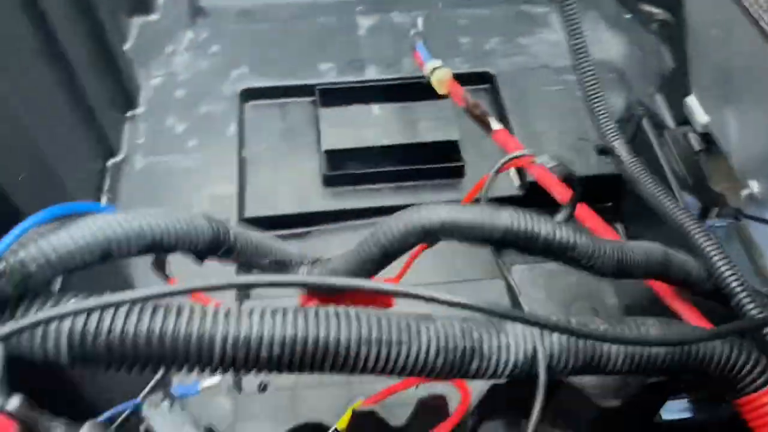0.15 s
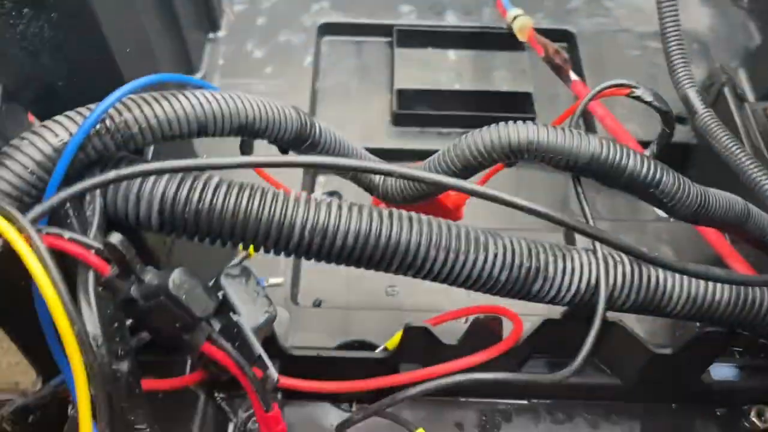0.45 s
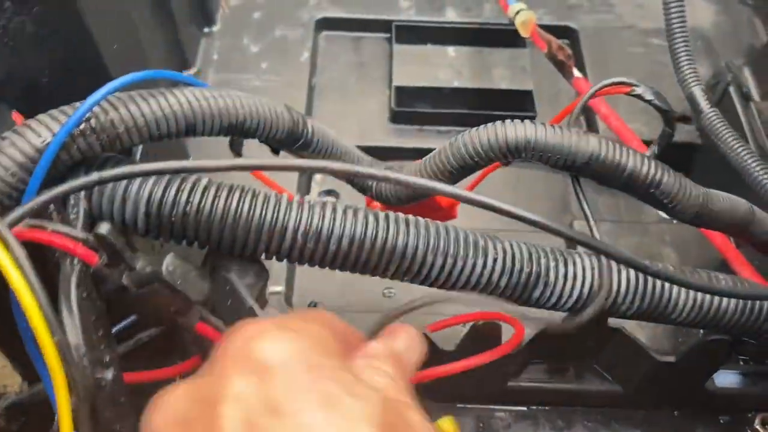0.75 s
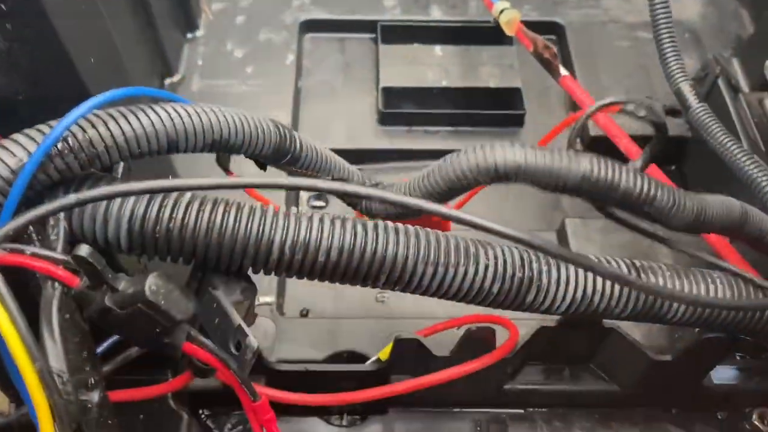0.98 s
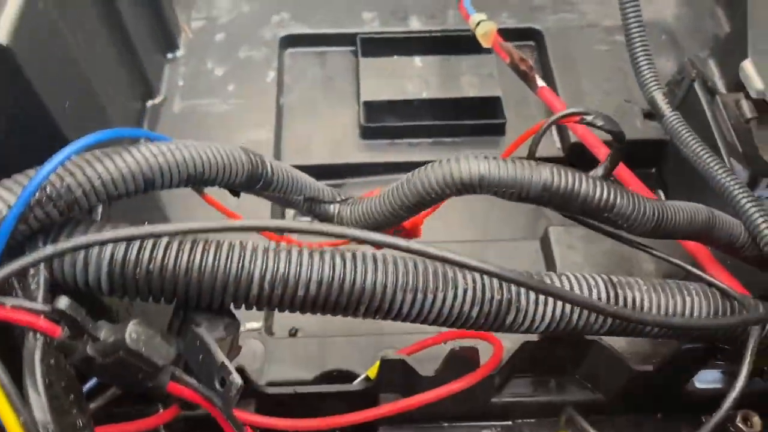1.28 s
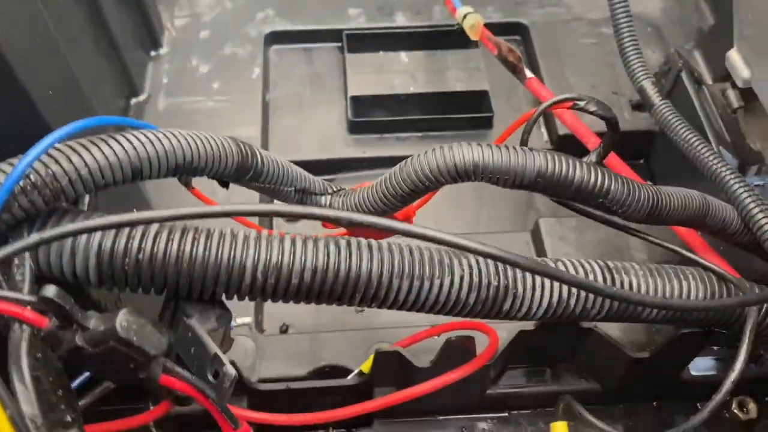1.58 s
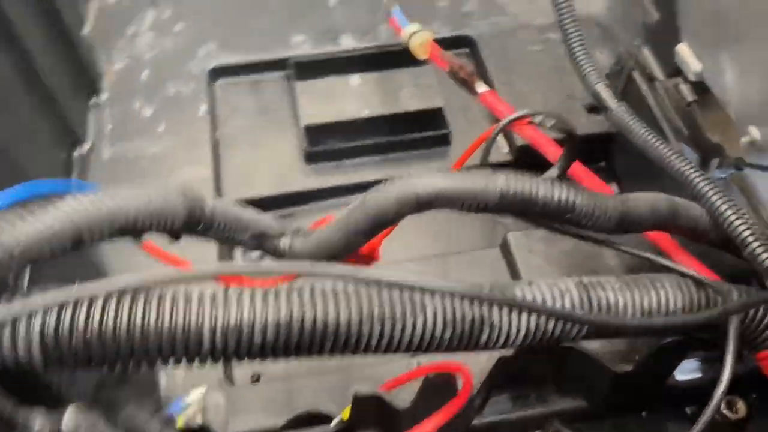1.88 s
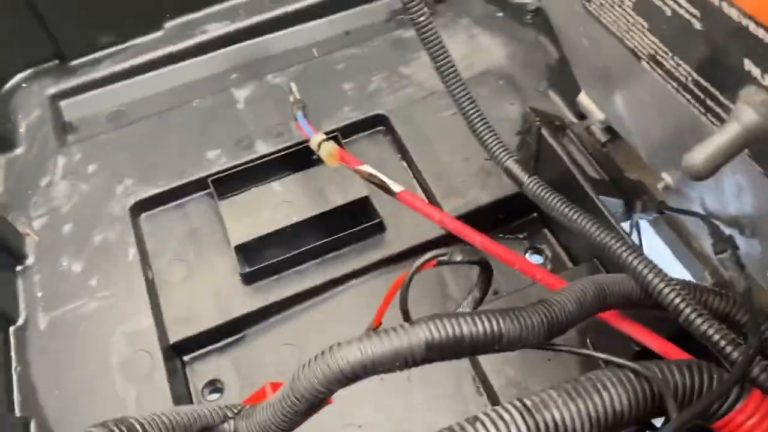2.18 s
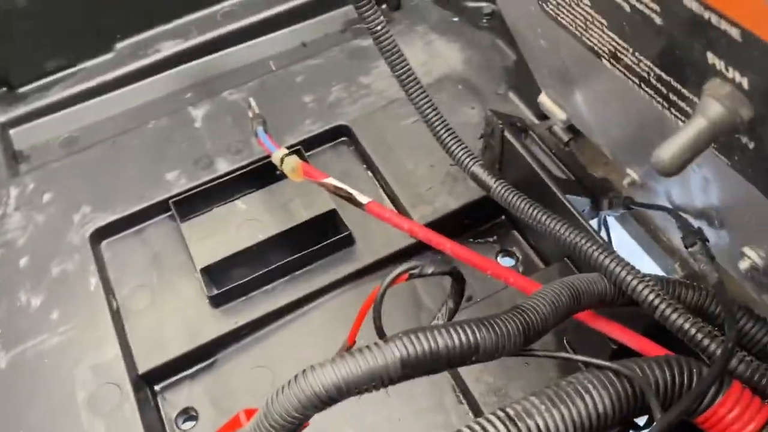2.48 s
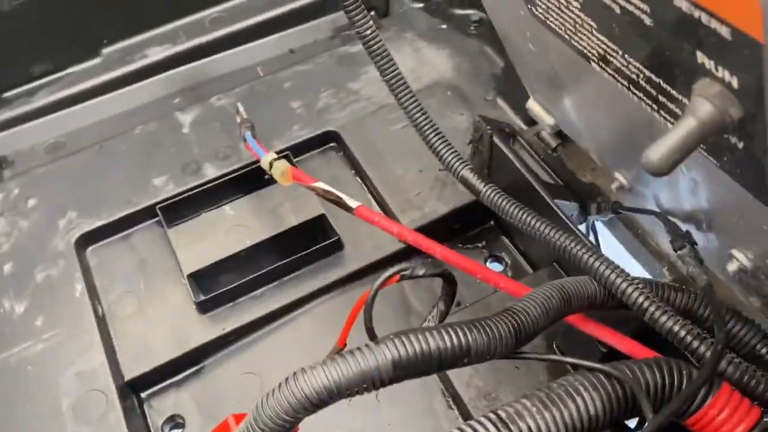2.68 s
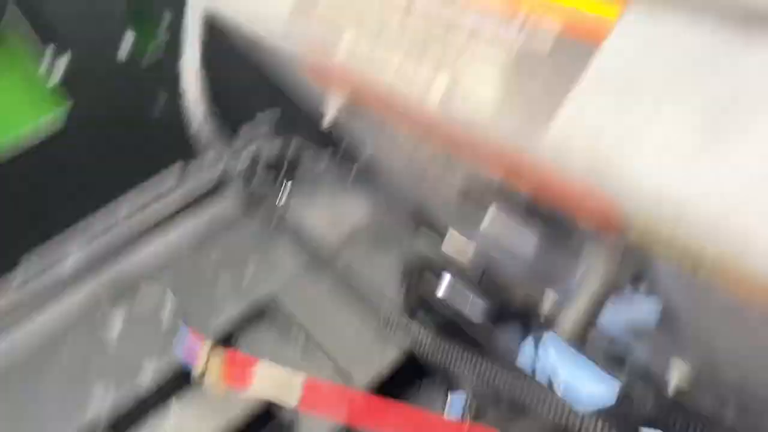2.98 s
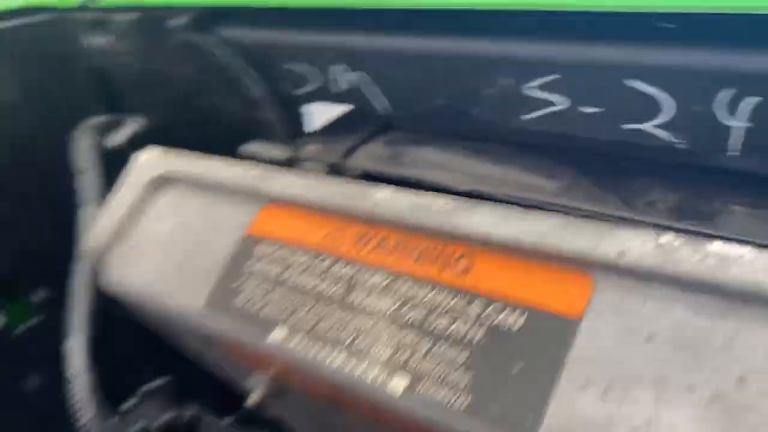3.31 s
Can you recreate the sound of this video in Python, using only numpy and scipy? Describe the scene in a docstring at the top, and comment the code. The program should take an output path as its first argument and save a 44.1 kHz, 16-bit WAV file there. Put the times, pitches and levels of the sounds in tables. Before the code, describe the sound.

Plastic-sheathed cables dragged across a hollow vehicle battery tray, close to the microphone: faint ticks and a brief rub first, a quiet gap, then rasping, snaps and knocks building to a hard clatter.

```python
"""In a vehicle's battery compartment, a hand drags a wiring harness in ribbed plastic loom, close to the microphone.
The loom rubs and rasps along the tray: coloured noise, made rough by many small rib slips.
Clips snap, ribs and wires tick, and loose cables knock on the hollow tray, hardest near the end:
each is a short burst of noise that dies away. The tray's resonances ring with all of these,
over a low, steady background noise."""
import sys
import numpy as np
from scipy import signal
from scipy.fft import rfft, irfft, next_fast_len
from scipy.io import wavfile
from scipy.ndimage import uniform_filter1d, map_coordinates

SR = 44100
rng = np.random.default_rng(int(sys.argv[2]) if len(sys.argv) > 2 else 0)


def dump(signal):
    """Clip the signal to [-1, 1] and save it as 16-bit WAV at the path in sys.argv[1]."""
    limited = np.clip(np.atleast_2d(signal).T, -1, 1)
    pcm = np.round(limited * 32767).astype(np.int16)
    wavfile.write(sys.argv[1], SR, pcm)


N = 152145  # length in samples
HIT = SR // 3  # samples in one snap, knock or tick
T = np.arange(HIT) / SR  # time within a hit, in seconds

# Every level/dB below is relative: the sources are balanced against each other afterwards.
# Strength of the loom's rubbing: t/s, level/dB
RUBBING = [(0.0, -29), (0.072, -36), (0.112, -52), (0.49, -51), (0.56, -40), (0.62, -34), (0.7, -45.5),
           (0.79, -50.5), (1.04, -44), (1.08, -55), (1.625, -57), (1.658, -30.5), (1.718, -37),
           (1.776, -41), (1.785, -28.5), (1.91, -27), (1.975, -22), (2.05, -36.5), (2.11, -43.5),
           (2.16, -31.5), (2.211, -25.5), (2.352, -42.5), (2.372, -26), (2.443, -39), (2.52, -36),
           (2.587, -30.5), (2.645, -42.5), (2.8, -31), (2.866, -23.5), (2.935, -23), (3.02, -34),
           (3.108, -36), (3.255, -14), (3.327, -30), (3.36, -17.5), (3.45, -17.5)]
# Treble of the rubbing, on top of its strength: t/s, level/dB
RASP_TREBLE = [(0, 0), (0.49, 0), (0.56, 5), (0.66, -1), (1.72, -11), (1.975, -4), (2.16, -9.5), (2.39, 0),
               (2.718, -19), (3.11, -7.5), (3.19, -9.5), (3.45, -5.5)]
# Strength of the heavy cables' rumble: t/s, level/dB
SHIFTING = [(0.0, -28.5), (0.18, -51.5), (0.56, -47.5), (0.62, -31.5), (0.79, -50), (0.99, -41.5),
            (1.61, -60), (1.68, -31.5), (1.85, -30.5), (2.335, -47.5), (2.52, -42.5), (2.585, -24),
            (2.645, -36.5), (2.935, -40.5), (3.11, -44), (3.255, -29), (3.45, -34.5)]
# Resonance of the rubbed spot as it moves: t/s, f/Hz
RUB_PITCH = [(0, 1260), (.6, 980), (1.93, 1450), (2.37, 1600), (2.42, 880), (2.86, 1030), (2.98, 1820),
             (3.19, 740)]
# Plastic parts snapping free: t/s, level/dB, ring f/Hz, ring height/dB, treble/dB, 60 dB decay t/s
SNAPS = [(0.5333, -33.5, 3870, 17, -16, 0.041), (0.946, -30, 1285, 25, -3, 0.1),
         (1.8091, -26, 3400, 9, -21.5, 0.042), (1.8645, -17.5, 4130, 11, -7.5, 0.038),
         (1.983, -22.5, 3600, 10, -16, 0.072), (2.0144, -13, 1115, 15, -22, 0.042),
         (2.195, -26, 1690, 11, -13.5, 0.21), (2.2346, -15, 3000, 2.5, -1.5, 0.082),
         (2.879, -18, 4520, 2.5, -19.5, 0.045), (2.9695, -13, 1820, 14, -13.5, 0.045),
         (3.345, -17, 3480, 18, -2, 0.056)]
# Cables hitting the tray: t/s, then body, thump, clack and crack, each level/dB
KNOCKS = [(0.001, -36, -40, -34, -49), (1.992, -32.5, -33.5, -25.5, -34), (2.236, -29, -46, -41, -14),
          (2.401, -27, -40, -33.5, -51), (2.5438, -18, -21, -23, -26.5), (2.6645, -18.5, -38, -18, -28),
          (2.773, -24, -36.5, -31.5, -39), (2.8797, -14.5, -26, -21.5, -22),
          (2.914, -26.5, -31.5, -52, -29.5), (3.1428, -13.5, -22.5, -17.5, -27.5),
          (3.163, -18.5, -30.5, -34, -23.5), (3.2168, -9, -14.5, -17.5, -20),
          (3.227, -13.5, -22.5, -18.5, -26.5), (3.2787, -14.5, -39, -18.5, -19),
          (3.381, -18.5, -28, -21, -38), (3.408, -8, -17, -27, -16), (3.4155, -16.5, -20, -12.5, -16)]
# Single ribs catching and wires rattling: t/s, level/dB, ring f/Hz
TICKS = [(0.1459, -25.5, 1090), (0.2079, -24, 1180), (0.2409, -31, 795), (0.283, -35.5, 1100),
         (0.343, -35, 850), (0.41, -39.5, 4400), (0.4322, -31, 4620), (0.8452, -28, 2120),
         (0.8778, -25.5, 3900), (0.9002, -29, 2700), (1.0249, -29, 1280), (1.042, -27, 1200),
         (1.6646, -20, 1940), (2.129, -27, 1370), (2.4695, -18.5, 2190), (2.857, -14, 4030),
         (2.965, -11, 1700), (3.137, -17.5, 2260), (3.262, -16, 1000), (3.293, -6.5, 2030),
         (3.444, -2.5, 4430)]
# Resonances of the tray, rung by all that touches it: f/Hz, level/dB over the direct sound
TRAY_MODES = [(163, -2), (200, -6), (355, 3.5), (424, 8.5), (699, 1), (1044, -4.5), (1203, -10.5)]
# Left channel's lead over the right: f/Hz, level/dB
LEAN = [(170, -4), (400, 4), (1200, 1), (4000, 1)]

# Noise colours of the sliding loom and cables, all f/Hz, level/dB
RUB_COLOUR = [(150, -13), (380, -1), (1700, 0.5), (2400, -2.5), (4500, -15.5)]
RASP_COLOUR = [(1200, -6), (2500, -5.5), (4000, 1.5), (7500, -11), (16000, -7)]
RUMBLE_COLOUR = [(20, -45), (42, -8.5), (180, 0.5), (900, -38.5)]
# Noise colours of a snap or tick, and of the four parts of a knock, all f/Hz, level/dB
SNAP_COLOUR = [(200, -13.5), (1100, -0.5), (4000, -3), (7000, -9), (16000, -10)]
THUMP_COLOUR = [(85, -35), (170, -6.5), (300, -18), (600, -89)]
BODY_COLOUR = [(150, -27), (400, -1.5), (1150, -2.5), (1600, -37.5), (3000, -69)]
CLACK_COLOUR = [(600, -61), (1250, -3.5), (2600, -13.5), (5500, -52)]
CRACK_COLOUR = [(1500, 0), (3200, 7), (4500, 0.5), (8000, -13.5), (16000, -13)]
# Noise colour of the steady background: f/Hz, level/dB
AIR_COLOUR = [(25, -5), (85, -2.5), (500, -33), (16000, -40.5)]
# How alike left and right are, where 1 is the same and 0 unrelated: f/Hz, likeness
ALIKE = [(130, 0.78), (500, -0.27), (4000, 0.38), (9000, 0.011)]
# Microphone colour: f/Hz, level/dB
MIC = [(7800, -1.5), (9000, -19.5), (10500, -3), (13500, -14.5), (15400, -16)]

SNAP_DB, KNOCK_DB, TICK_DB, AIR_DB = 2, -3, -17.5, -47.5  # balance of the sources
# Ribs slipping over an edge: typical rate, 60 dB decay of each slip, and spread of their levels
RIBS_PER_S, RIB_T60_S, RIB_SCATTER_DB = 220, 0.013, 3.2
STICK_DB = -54.5  # rubbing level under which the loom sticks
THUMP_T60_S, BODY_T60_S, CLACK_T60_S, CRACK_T60_S = .1, 0.067, 0.056, 0.051  # 60 dB decays
SWELL_CYCLES = 1.8  # cycles that the tray takes to answer a blow
# A tick's decay at level 0 dB; harder ticks ring longer, by this power
TICK_T60_S, TICK_LINGER = .042, .42
RING_OCTAVES, TREBLE_NEUTRAL_DB, TICK_RING_DB = 0.27, -13, 10.5
UPPER_MODE_RATIO, UPPER_MODE_SHARE = 1.744, 0.66  # second resonance: pitch and height over the first
RIPPLE_DB, RIPPLE_HZ = 4, 170.1  # depth and spacing of a struck spot's own peaks
ATTACK_S, TAIL_DB, TAIL_T60_S = 0.00032, -22, 0.21  # contact time; after-ring of the compartment
TRAY_WIDTH_HZ = 22.7  # width of each tray resonance
LOW_HZ, TOP_HZ = 33, 16500  # bass cut and upper limit


def drag(rumble_db=-4, rub_db=-5, rasp_db=-4):
    """The sliding loom: the same slips drive rub and rasp, while the heavy cables rumble on the tray."""
    rumble, rub, treble = [curve(rows) for rows in (SHIFTING, RUBBING, RASP_TREBLE)]
    rub = rub * rub / np.hypot(rub, amp(STICK_DB))  # a loom that barely moves sticks and fades out
    slips = ribs(smooth=1.0)
    low_rub = amp(rub_db) * wandering(shaped(RUB_COLOUR, N))
    high_rasp = amp(rasp_db) * treble * wandering(shaped(RASP_COLOUR, N))
    scrape = rub * (low_rub + high_rasp)
    pressed = np.clip(rub / amp(-50.5), 0, 1)  # ribs only catch under load
    roughness = 1 + pressed * (slips - 1)
    return amp(rumble_db) * rumble * shaped(RUMBLE_COLOUR, N) + scrape * roughness


def ribs(smooth):
    """Loudness curve of ribs slipping at an uneven rate, over a smooth share of friction."""
    gap_draws, level_draws = rng.standard_normal((2, 4000))
    gaps_s = np.exp(.6 * gap_draws) / RIBS_PER_S
    at = (np.cumsum(gaps_s) * SR).astype(int)
    heights = amp(RIB_SCATTER_DB * np.clip(level_draws, -2, 2))
    inside = at < N
    power = np.bincount(at[inside], heights[inside] ** 2, N)
    decay = amp(-60 * T / RIB_T60_S) ** 2
    slips = np.sqrt(np.abs(signal.fftconvolve(power, decay)[:N]))
    return unit(unit(slips) + smooth)


def wandering(x, height_db=8, octaves=0.9):
    """The rubbed spot moves: one broad resonance follows it, small ones come and go."""
    hz, s, z = signal.stft(x, SR, nperseg=512)
    pitch = np.interp(s, *np.transpose(RUB_PITCH))
    bell = np.exp(-.5 * (np.log2((hz[:, None] + 1) / pitch) / octaves) ** 2)
    patches = uniform_filter1d(rng.standard_normal(z.shape[1:]), 3, 0)  # smooth over pitch
    patches_db = 4 * unit(uniform_filter1d(patches, 8, 1))  # then over time
    coloured = z * amp(height_db * bell + patches_db)
    return unit(signal.istft(coloured, SR, nperseg=512)[1][:, :N])


def snaps():
    """Each clip or connector rings briefly around its own pitch as it springs free."""
    out = np.zeros((2, N))
    for s, db, ring_hz, ring_db, treble_db, t60 in SNAPS:
        def colour(hz):
            treble_share = along([(4000, 0.081), (8000, 0.92)], hz)
            treble = (treble_db - TREBLE_NEUTRAL_DB) * treble_share
            return along(SNAP_COLOUR, hz) + ripple(hz) + ring_db * ring(hz, ring_hz) + treble
        add(out, s, amp(db + SNAP_DB) * dying(noise(colour, HIT), t60))
    return out


def knocks():
    """A cable lands on the tray: the low parts of the blow come later and outlast the high ones."""
    out = np.zeros((2, N))
    for s, body_db, thump_db, clack_db, crack_db in KNOCKS:
        parts = [(THUMP_COLOUR, thump_db, THUMP_T60_S), (BODY_COLOUR, body_db, BODY_T60_S),
                 (CLACK_COLOUR, clack_db, CLACK_T60_S), (CRACK_COLOUR, crack_db, CRACK_T60_S)]
        for spectrum, db, t60 in parts:
            burst = noise(lambda hz: along(spectrum, hz) + ripple(hz), HIT)
            add(out, s, amp(db + KNOCK_DB) * dying(burst, t60))
    # Delay each pitch by the same number of its own cycles
    return filtered(out, lambda hz: np.exp(-2j * np.pi * SWELL_CYCLES * np.log(hz + 1)))


def ticks():
    """Short dry clicks of the flexing loom and its rattling wires, each at its own pitch."""
    out = np.zeros((2, N))
    for s, db, ring_hz in TICKS:
        click = noise(lambda hz: along(SNAP_COLOUR, hz) + TICK_RING_DB * ring(hz, ring_hz), HIT)
        t60 = TICK_T60_S * amp(db) ** TICK_LINGER
        add(out, s, amp(db + TICK_DB) * dying(click, t60))
    return out


def ring(hz, ring_hz):
    """The two broad resonances of a small plastic part, as bumps over frequency."""
    def bell(centre_hz):
        return np.exp(-.5 * (np.log2((hz + 1) / centre_hz) / RING_OCTAVES) ** 2)
    return bell(ring_hz) + UPPER_MODE_SHARE * bell(UPPER_MODE_RATIO * ring_hz)


def ripple(hz):
    """Random peaks and gaps of one struck spot, in dB."""
    heights = rng.standard_normal(size=512)
    return RIPPLE_DB * map_coordinates(heights, [hz / RIPPLE_HZ], mode="mirror")


def dying(x, t60):
    """Dense, well damped plastic resonances: a fast fall, then the compartment's faint after-ring."""
    fall = np.hypot(amp(-60 * T / t60), amp(TAIL_DB - 60 * T / TAIL_T60_S))
    return struck(x * fall * (1 - np.exp(-T / ATTACK_S)))


def struck(x):
    """Scale a ring to rms 1 over its first 20 ms."""
    return x / np.sqrt(np.mean(x[:, :SR // 50] ** 2) + 1e-20)


def tray(hz):
    """The direct sound plus the hollow tray's resonances, leaning left or right with frequency."""
    damping = 1j * hz * TRAY_WIDTH_HZ
    modes = sum(amp(db) * damping / (mode_hz ** 2 - hz ** 2 + damping) for mode_hz, db in TRAY_MODES)
    return (1 + modes) * amp(np.outer([.5, -.5], along(LEAN, hz)))


def background():
    """Low, steady noise that does not pass through the tray."""
    return amp(AIR_DB) * shaped(AIR_COLOUR, N)


def shaped(points, size):
    """Stereo noise with a tabulated colour."""
    return noise(lambda hz: along(points, hz), size)


def noise(colour_db, size):
    """Stereo noise of rms 1 with the given colour; left and right share the bass most."""
    m = next_fast_len(size)
    hz = np.fft.rfftfreq(m, 1 / SR)
    turn = np.arccos(np.clip(along(ALIKE, hz), -1, 1)) / 2  # splits power into middle and sides
    phases = np.exp(2j * np.pi * rng.random((2, len(hz))))
    spectrum = phases * amp(colour_db(hz)) * [np.cos(turn), np.sin(turn)]
    mid, side = irfft(spectrum, m)[:, :size]
    return unit(np.array([mid + side, mid - side]))


def filtered(x, response):
    """x times a complex response of frequency."""
    m = next_fast_len(N + SR // 2)
    return irfft(rfft(x, m) * response(np.fft.rfftfreq(m, 1 / SR)), m)[:, :N]


def add(out, s, x):
    """Mix a sound in at a time."""
    i = max(0, round(s * SR))
    out[:, i:i + HIT] += x[:, :N - i]


def curve(rows):
    """Turn (s, dB) rows into a gain for every sample."""
    return amp(np.interp(np.arange(N) / SR, *np.transpose(rows)))


def along(points, hz):
    """(Hz, value) points read on a log axis."""
    f, v = np.transpose(points)
    return np.interp(np.log(hz + 1), np.log(f + 1), v)


def amp(db):
    """Decibels to gain."""
    return 10 ** (np.asarray(db) / 20)


def unit(x):
    """Scale to rms 1 (average strength)."""
    return x / np.sqrt(np.mean(x ** 2) + 1e-20)


def scene():
    """The harness in its tray, over a low, steady background."""
    harness = drag() + snaps() + knocks() + ticks()
    return filtered(harness, tray) + background()


def record(dry):
    """Microphone colour and bass cut, soft overload on the hardest blows, and the upper limit."""
    x = filtered(dry, lambda hz: amp(along(MIC, hz)) * hz ** 6 / (hz ** 6 + LOW_HZ ** 6))
    x = x / (1 + (x / .92) ** 6) ** (1 / 6)  # rounds off peaks near 0.92
    return filtered(x, lambda hz: hz < TOP_HZ)


dry = scene()
out = record(dry)
dump(out)
```